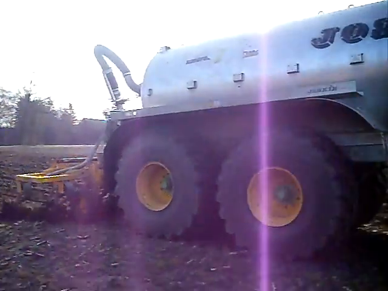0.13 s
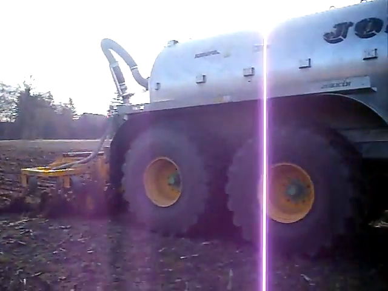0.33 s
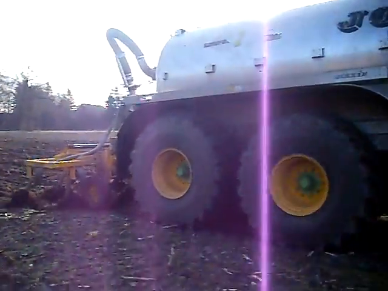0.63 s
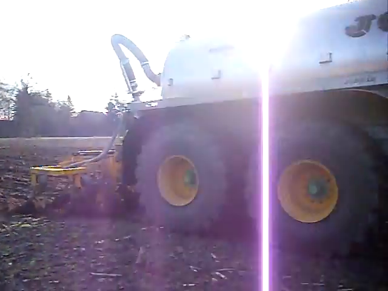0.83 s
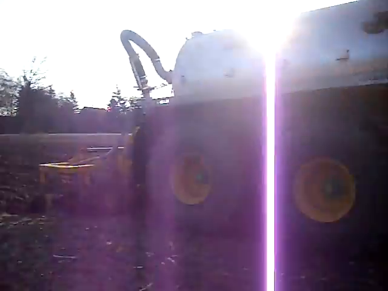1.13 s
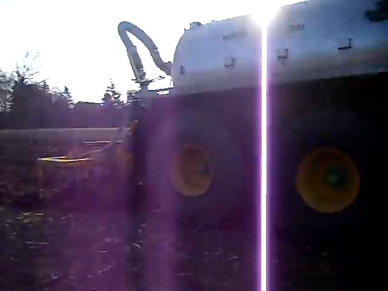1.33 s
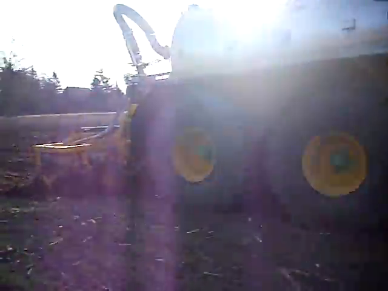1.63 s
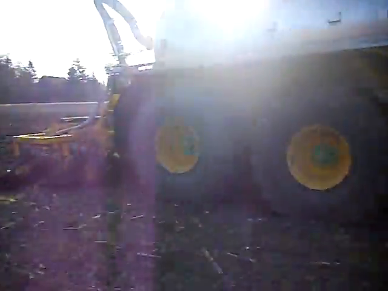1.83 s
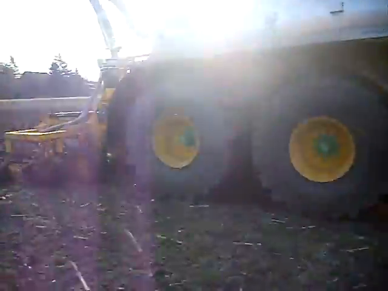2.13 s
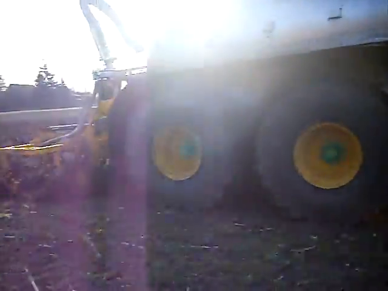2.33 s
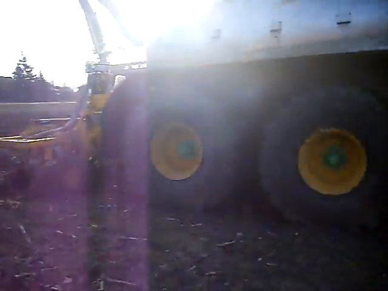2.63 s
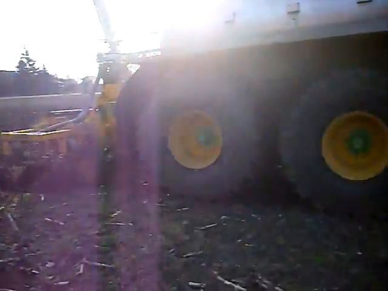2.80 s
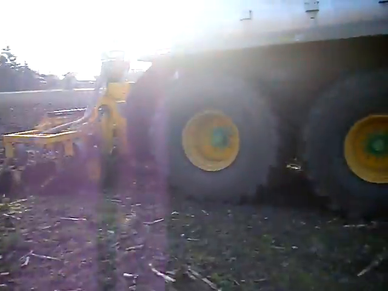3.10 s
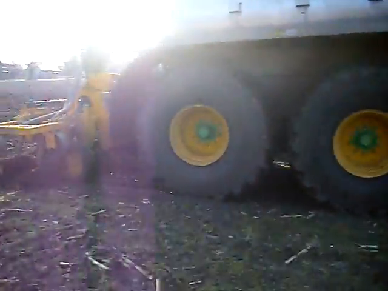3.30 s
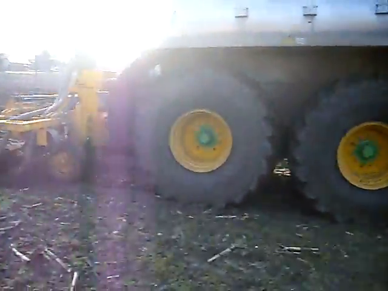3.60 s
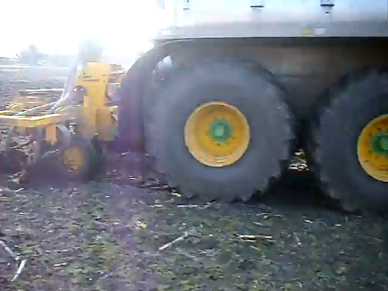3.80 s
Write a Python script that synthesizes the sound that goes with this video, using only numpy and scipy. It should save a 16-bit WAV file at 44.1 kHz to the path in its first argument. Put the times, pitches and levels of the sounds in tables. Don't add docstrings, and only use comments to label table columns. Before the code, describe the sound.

A tractor engine drones continuously in an open field, with a steady pump hum, faint gear whine and rough broadband roar; close, muffled low-quality camera microphone with wind rumble, fading slightly towards the end.

```python
import sys
import numpy as np
from scipy import signal
from scipy.fft import rfft, irfft, next_fast_len
from scipy.io import wavfile
from scipy.ndimage import uniform_filter1d, map_coordinates

SR = 44100
rng = np.random.default_rng(int(sys.argv[2]) if len(sys.argv) > 2 else 0)


def dump_mix(stems):
    frames = np.atleast_2d(stems).T
    limited = np.clip(frames, -1, 1)
    pcm = np.round(limited * 32767).astype(np.int16)
    wavfile.write(sys.argv[1], SR, pcm)


def how_loud(loudness_db):
    steps = np.asarray(loudness_db, float) / 20
    return 10 ** steps


N = 174195
T = np.arange(N) / SR
CYCLE_HZ = 15.65


def unit(x):
    return x / np.sqrt(np.mean(x ** 2) + 1e-20)


def curves(rows):
    seconds, *columns = np.transpose(rows)
    return [np.interp(T, seconds, column) for column in columns]


def wobble(rate):
    knots = rng.standard_normal(400)
    return map_coordinates(knots, [T * rate])


def tone(cycles, swell_db, blur, rate):
    swell = how_loud(swell_db * wobble(rate))
    phase = cycles + rng.random() + blur * wobble(rate)
    return np.sqrt(2) * swell * np.sin(2 * np.pi * phase)


def rush(spectrum, patchy_db):
    z = signal.stft(rng.standard_normal(N + 512), nperseg=512)[2]
    patches = uniform_filter1d(rng.standard_normal(z.shape), size=5, axis=0)
    patches = uniform_filter1d(patches, size=12, axis=1)
    noise = signal.istft(z * how_loud(patchy_db * unit(patches)), nperseg=512)[1][:N]
    hz, db = np.transpose(spectrum)
    size = next_fast_len(N + 8192)
    bin_hz = np.fft.rfftfreq(size, 1 / SR)
    colour = how_loud(np.interp(np.log(bin_hz + 1), np.log(hz + 1), db))
    return unit(irfft(rfft(noise, size) * colour, size)[:N])


def seconds_turned():
    # time in seconds, speed as the pump's third harmonic in Hz.
    speed = [(0, 306), (.16, 310.9), (.44, 303.1), (.72, 305.3), (1.07, 298.9), (1.36, 307.1),
             (1.56, 301.2), (1.74, 304.8), (1.96, 299.4), (2.18, 305.2), (2.4, 302), (2.65, 306.6),
             (2.9, 301.2), (3.05, 303.8), (3.24, 298.7), (3.49, 305.4), (3.74, 302.3), (3.95, 302.9)]
    nominal_hz = 303.5
    pump_tone_hz = uniform_filter1d(curves(speed)[0], size=2400)
    return np.cumsum(pump_tone_hz) / nominal_hz / SR


def wind():
    # time in seconds, level in dB.
    gusts = [(0, -21), (.35, -18), (.8, -20), (1.3, -22), (1.7, -20), (2.2, -24), (2.6, -21), (3.2, -27),
             (3.5, -23), (3.95, -25)]
    # frequency in Hz, density in dB per Hz.
    wind_spectrum = [(1, -8), (5, 0), (12, -3), (20, -2), (30, -8), (45, -18), (70, -40), (100, -120)]
    gust_db = curves(gusts)[0] + 1.5 * wobble(5)
    return how_loud(gust_db) * rush(wind_spectrum, patchy_db=.3)


def roar(turned, roar_db):
    # frequency in Hz, density of the body in dB per Hz.
    body_spectrum = [(26, -52), (45, -15), (98, -9.5), (146, -9), (247, -13), (303, -9), (361, -12.5),
                     (1140, -15.5), (1500, -42.5), (1950, -77.5), (3300, -120)]
    # frequency in Hz, density of the hiss in dB per Hz.
    hiss_spectrum = [(820, -34), (1400, -17), (1590, -11), (2220, -4.5), (2410, -7.5), (3460, -12),
                     (4000, -9), (5200, -48.5), (8800, -120)]
    hiss_db, chuff = -8, 0.11
    beat = 1 + chuff * np.sin(2 * np.pi * 6 * CYCLE_HZ * turned)
    body = how_loud(0.2 * wobble(7)) * rush(body_spectrum, patchy_db=0.43)
    hiss = how_loud(hiss_db + 0.51 * wobble(12)) * beat * rush(hiss_spectrum, patchy_db=0.9)
    return how_loud(roar_db) * (body + hiss)


def hose():
    # time in seconds, throb rate in Hz, level in dB.
    throb = [(0, 41.79, -15.5), (.35, 42.94, -27), (.8, 37.92, -28.5), (1.3, 37.63, -18.5),
             (1.5, 37.02, -18), (1.68, 33.01, -27), (1.86, 29.19, -12.5), (2.08, 29, -25.5),
             (2.35, 27.84, -23), (2.6, 26.38, -24), (2.8, 25.98, -12.5), (3, 28.6, -17),
             (3.25, 31.7, -14.5), (3.95, 31.92, -14.5)]
    octave_db = -17.5
    hz, db = curves(throb)
    cycles = np.cumsum(hz) / SR
    fundamental = tone(cycles, 0.5, .03, rate=6)
    octave = tone(2 * cycles, 2.3, 0.039, rate=8.3)
    return how_loud(db) * (fundamental + how_loud(octave_db) * octave)


def gears(turned):
    # frequency at nominal speed in Hz, level in dB, swell in dB, blur in cycles.
    light_meshes = [(207.37, -25, -0.05, .03), (318.8, -35, 3.5, 0.036), (415.2, -44.5, -4, 0.11),
                    (476, -46.5, 0, .05), (589, -37.5, -4, .05), (596.8, -31.5, -1, .06),
                    (631, -47, -0.5, .05), (651.5, -36.5, 2, 0.049), (1070, -39.5, 4.5, 0.055),
                    (1212, -47.5, 1.5, .08), (1790, -52.5, 4.5, .1), (1955, -55, 5, 0.075)]
    # time in seconds, then axle, mesh, mesh octave and whine levels in dB.
    load = [(0, -22.5, -21.5, -35, -35.5), (.15, -23, -19.5, -39.5, -28.5), (.3, -21, -25, -32, -33),
            (.5, -26, -29.5, -26.5, -39.5), (.85, -25.5, -31.5, -24.5, -34), (1.15, -21, -34.5, -34, -36),
            (1.6, -33.5, -27.5, -26, -30.5), (1.95, -32, -27, -29, -39.5), (2.3, -38, -28, -23.5, -42),
            (2.65, -35, -31, -26.5, -43), (2.87, -36, -30, -37.5, -47), (3.1, -36.5, -34.5, -25.5, -47.5),
            (3.3, -40, -26.5, -30, -49), (3.5, -19.5, -33, -29.5, -53), (3.95, -26.5, -26.5, -24.5, -33)]
    axle_hz, mesh_hz = 531.9, 566.4
    axle, mesh, octave, whine = how_loud(curves(load))
    out = sum(how_loud(db) * tone(hz * turned, swell_db, blur, rate=8) for hz, db, swell_db, blur in light_meshes)
    out = out + axle * tone(axle_hz * turned, 1.8, 0.029, rate=12)
    out = out + mesh * tone(mesh_hz * turned, 2.4, 0.02, rate=13)
    out = out + octave * tone(2 * mesh_hz * turned, 3, .08, rate=20)
    return out + whine * tone(4 * mesh_hz * turned, 2.4, 0.061, rate=28)


def pump(turned, pump_db):
    # multiple of the vane rate, level in dB.
    vanes = [(1, -12), (2, -16), (3, 2), (4, -20.5), (5, -18), (8, -30), (9, -20)]
    vane_hz = 101.17
    out = 0
    for multiple, db in vanes:
        swell_db = 1.1 if db > -10 else 2.5
        out = out + how_loud(db) * tone(multiple * vane_hz * turned, swell_db, 0.0086, rate=14)
    return how_loud(pump_db) * out


def engine(turned, exhaust_db):
    # multiple of the engine cycle, level relative to the firing tone in dB.
    firing = [(5, -23.5), (6, 0), (7, -29.5), (8, -31.5), (9, -24.5), (10, -25), (12, -26), (15, -28),
              (17, -29.5), (18, -27), (45, -23), (48, -41.5)]
    out = 0
    for multiple, db in firing:
        swell_db = .6 if db > -10 else 2.5
        out = out + how_loud(db) * tone(multiple * CYCLE_HZ * turned, swell_db, 0.016, rate=12)
    return how_loud(exhaust_db) * out


def scene():
    # time in seconds, then exhaust, pump and roar levels in dB.
    away = [(0, -12, -16.5, -18.5), (.6, -12.5, -16.5, -20.5), (1.3, -11.5, -17.5, -19.5),
            (2, -13.5, -17, -20), (2.6, -14.5, -18.5, -20.5), (3.2, -13.5, -21, -21),
            (3.95, -17.5, -18, -23)]
    turned = seconds_turned()
    exhaust_db, pump_db, roar_db = curves(away)
    background = wind() + roar(turned, roar_db) + hose()
    machine = gears(turned) + pump(turned, pump_db) + engine(turned, exhaust_db)
    return (background + machine)[None]


def top_cut(x):
    return signal.sosfilt(signal.butter(12, 15848, fs=SR, output="sos"), x)


def record(dry):
    overload, ceiling = .699, .703
    mirror_db = -79
    buzz_hz, buzz_db = 3781, -51
    stop_s = 0.0034
    heard = dry + how_loud(buzz_db) * tone(buzz_hz * T, 2, .05, rate=6.7)
    heard = heard * np.clip((N / SR - T) / stop_s, 0, 1)
    slow = signal.resample_poly(heard, 80, 441, axis=1, padtype="edge")
    slow = np.clip(slow, -overload, overload)
    smooth = signal.firwin(32 * 441 + 1, 3975, window=("kaiser", 9), fs=8000 * 441)
    fast = signal.resample_poly(slow, 441, 80, axis=1, window=smooth, padtype="edge")[:, :N]
    fast = fast * (1 + how_loud(mirror_db) * np.cos(2 * np.pi * 8000 * T))
    mix = np.clip(fast, -ceiling, ceiling)
    return top_cut(mix)


dry = scene()
out = record(dry)
dump_mix(out)
```